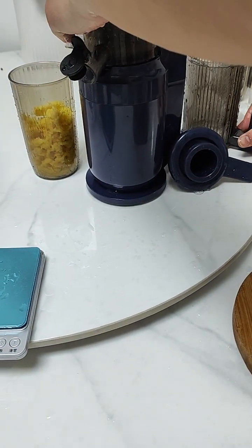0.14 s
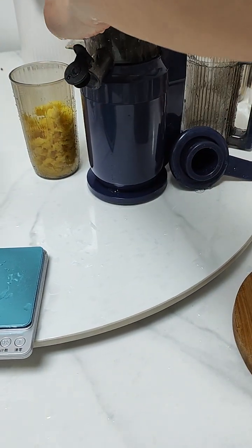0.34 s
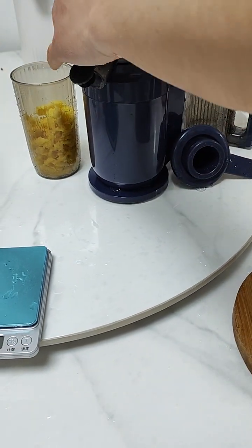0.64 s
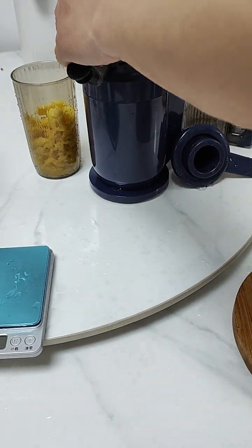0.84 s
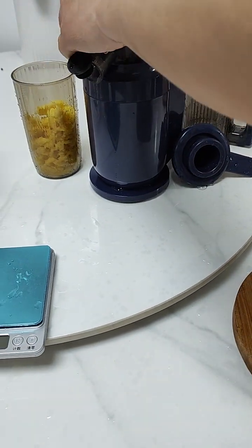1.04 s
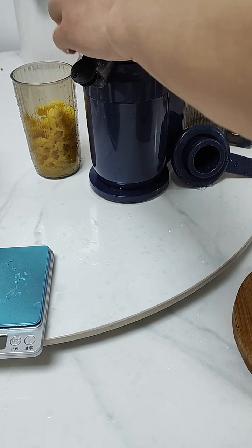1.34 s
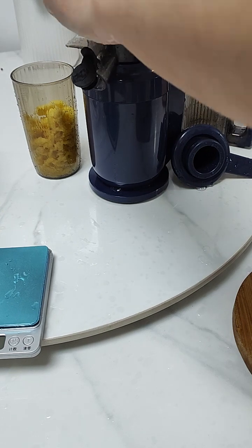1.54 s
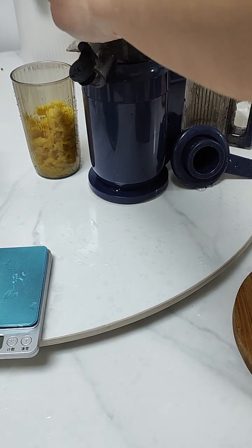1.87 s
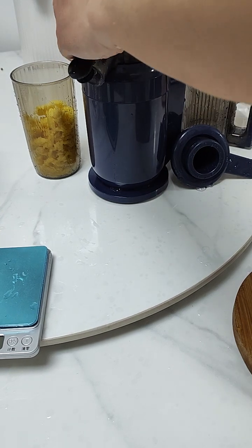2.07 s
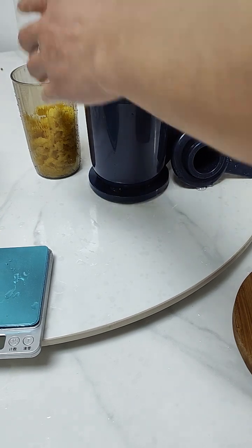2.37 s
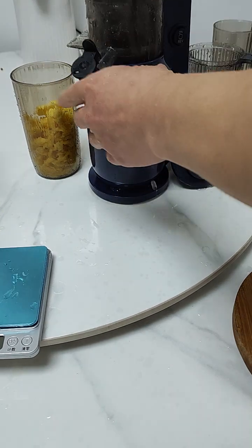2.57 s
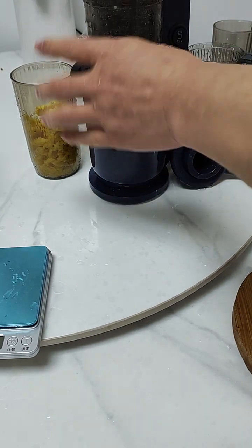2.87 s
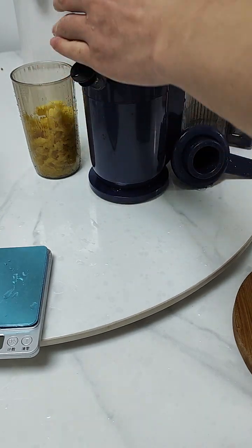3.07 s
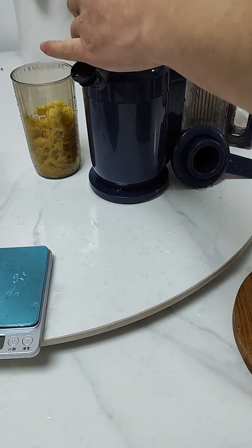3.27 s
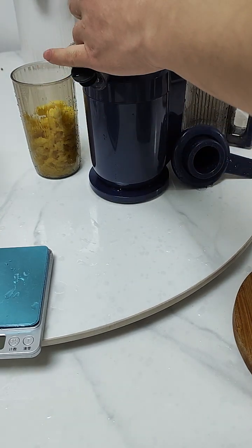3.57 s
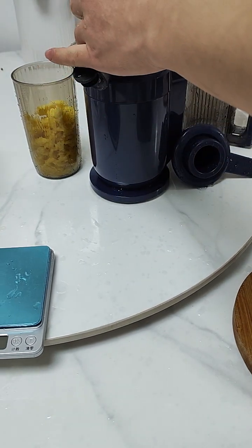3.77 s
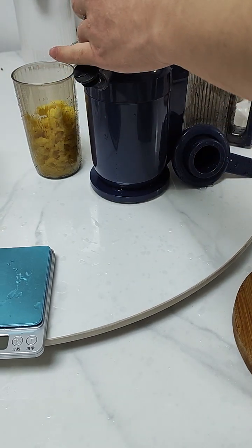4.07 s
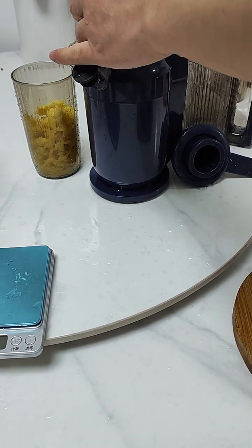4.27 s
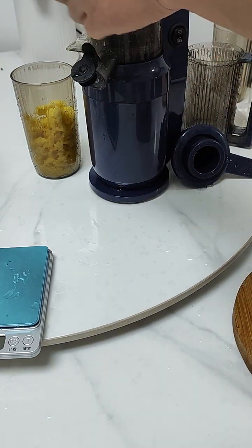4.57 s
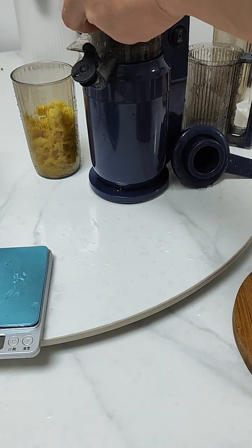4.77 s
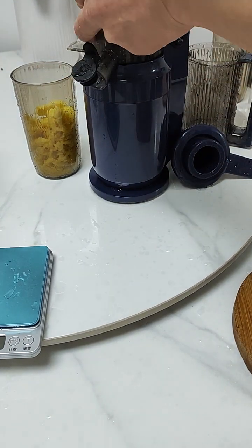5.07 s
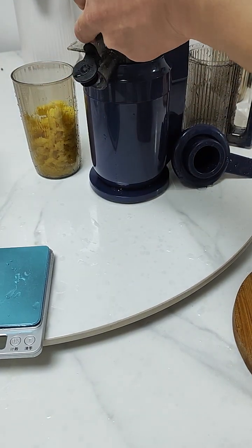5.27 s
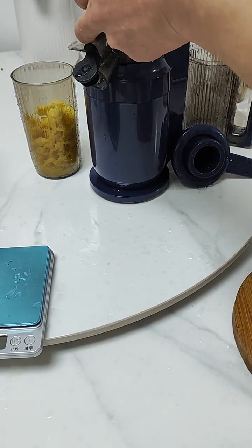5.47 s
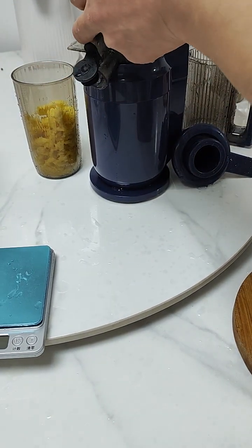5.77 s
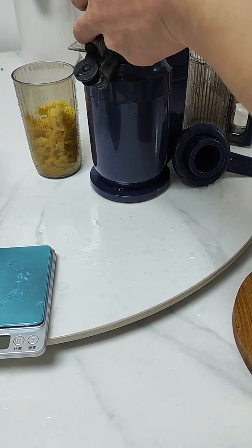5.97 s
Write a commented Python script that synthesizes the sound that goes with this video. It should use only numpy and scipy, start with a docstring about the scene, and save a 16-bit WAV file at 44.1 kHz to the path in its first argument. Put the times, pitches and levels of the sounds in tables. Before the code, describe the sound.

Close to a stone table in a bare, reverberant kitchen, a jug lands with hollow knocks at the very start. After a gap, hands fit a hard plastic bowl onto a base: light ticks, then sharp clacks in tight bursts, another rattle, and finally sparse, faint taps with barely audible rubbing. A low, quiet room tone continues throughout, picked up by a close stereo phone microphone.

```python
"""In a bare, echoing kitchen, hands fit a hard plastic juicer bowl onto its base on a stone table.
A jug is set down first; then the parts knock, tick and rub, over a quiet room tone.
Blows are sums of damped modes with short clicks; rubbing and room tone are coloured noise.
The room answers with sparse decaying taps; two unlike phone microphone ports listen from close by."""
import sys
import numpy as np
from scipy import signal
from scipy.io import wavfile
from scipy.ndimage import uniform_filter1d

SR = 44100
rng = np.random.default_rng(int(sys.argv[2]) if len(sys.argv) > 2 else 0)


def generate_wav(sig):
    """Save sig (samples, or channels by samples) to the path in sys.argv[1] as 16-bit PCM at SR."""
    pcm = np.round(np.clip(np.atleast_2d(sig).T, -1, 1) * 32767).astype(np.int16)
    wavfile.write(sys.argv[1], SR, pcm)


N = 270326  # samples

# Blows of the jug on the table, then of the bowl on its base. Each row: start [s],
# low ring pitch [Hz], low ring level [dB], treble ring pitch [Hz], treble ring level [dB],
# crack level [dB], tick level [dB], table thud level [dB], left over right level [dB].
JUG_KNOCKS = [(0.005, 734, -10, 1720, -30.5, -42, -39.5, -51, 5.5),
              (0.051, 720, -15, 1680, -43, -47, -55, -43.5, 1),
              (0.206, 816, -12, 1880, -29, -39.5, -23.5, -29, 0)]
BOWL_KNOCKS = [(0.967, 869, -125, 2160, -61, -54, -63, -56, 4),
               (1.017, 1200, -26.5, 1740, -37, -33, -46.5, -53, 0.5),
               (1.267, 890, -39, 2400, -43, -32, -30.5, -59.5, -4),
               (1.49, 1170, -48.5, 3010, -57, -50.5, -55, -55, 2),
               (1.514, 1060, -26, 1650, -42, -44, -39.5, -45, -2.5),
               (1.633, 1130, -41, 4000, -42, -45, -32, -52, 1),
               (1.654, 1096, -17, 2550, -24, -20, -51, -54, -6),
               (1.657, 1070, -8, 2690, -27, -25.5, -11.5, -66, 6),
               (1.667, 1080, -18.5, 2130, -47, -15.5, -24, -33, -10.5),
               (1.924, 1165, -22, 3110, -28.5, -26.5, -25, -66, -5),
               (1.935, 1200, -19, 3100, -39, -17.5, -14, -39, 1.5),
               (1.956, 1290, -13.5, 2560, -49, -14, -27, -71, 11),
               (1.962, 1150, -33, 3100, -49, -21.5, -19, -46, 17.5),
               (2.288, 730, -30, 3130, -56, -38.5, -35, -43, -4),
               (2.291, 1240, -52, 2170, -48.5, -31.5, -55, -52, 2),
               (2.3, 1120, -31, 1680, -42.5, -39, -45, -56, 8),
               (2.381, 824, -33, 3200, -50, -44.5, -44, -55, -3),
               (2.395, 1140, -33, 2080, -57, -47, -58, -45.5, 11),
               (2.535, 746, -52, 1750, -73, -67.5, -81, -67.5, -6),
               (2.661, 738, -52, 2500, -57, -58, -61, -45.5, 8),
               (2.686, 1180, -36.5, 1950, -58, -36.5, -36.5, -59, 1),
               (2.693, 1120, -32, 2740, -38, -39, -54, -39.5, 2),
               (2.703, 544, -19, 2680, -28, -23, -23, -38.5, 3.5),
               (2.707, 740, -25, 1880, -27, -31, -55, -34.5, -8),
               (2.715, 1000, -16.5, 2400, -31, -32, -28.5, -40.5, 11.5),
               (2.723, 500, -29.5, 1940, -53, -35, -26.5, -74, -0.5),
               (3.124, 620, -38.5, 2800, -56.5, -50.5, -49, -65, 0),
               (3.184, 630, -61.5, 2194, -69, -62, -59, -54.5, -2.5),
               (3.347, 544, -72, 3730, -64.5, -64.5, -76.5, -63.5, 1),
               (3.74, 581, -54.5, 1920, -73, -81, -86.5, -65.5, -13.5),
               (4.206, 890, -44.5, 2650, -46.5, -45, -40, -54.5, -3),
               (4.324, 600, -47.5, 2970, -60, -61, -68, -65.5, -1),
               (4.455, 770, -44.5, 2810, -50, -53.5, -71, -54, -4),
               (4.464, 647, -38.5, 2740, -42, -40.5, -70, -62, 4.5),
               (4.665, 1240, -62, 2580, -61.5, -50.5, -65.5, -54, 2),
               (4.672, 602, -38.5, 2860, -61, -66, -72, -68, -10),
               (4.775, 744, -35, 2840, -47, -44.5, -59, -51, 0.5),
               (4.796, 578, -41.5, 2965, -62, -48, -45, -64, -2),
               (5.437, 818, -66, 1940, -64, -68.5, -56, -58, 6),
               (5.463, 730, -50, 2850, -61.5, -62, -60, -75, 2),
               (5.678, 530, -48, 3580, -70.5, -69, -69.5, -43, 0),
               (5.69, 660, -44, 2580, -60.5, -47, -61, -56, 8),
               (5.712, 583, -48, 3090, -71, -53.5, -67, -52, -2),
               (5.739, 532, -61, 2290, -68, -50, -64, -69, -1)]
# Modes of the struck bodies. Each row: frequency [Hz], bandwidth [Hz], relative level [dB].
JUG_MODES = [(345, 30, -9), (454, 4.6, -17), (490, 17, 0.5), (580, 22, -3.5), (736.5, 19, -7),
             (781, 26, 5.5), (1023, 59, 8.5), (1345, 24, 3), (1502, 90, 5), (1776, 23, -11.5),
             (2080, 33, -21), (2370, 69, -16), (3300, 79, -14), (3480, 140, -17), (5060, 310, 8),
             (5500, 550, 10.5), (6650, 510, 23)]
BOWL_MODES = [(459, 28, -8), (585, 73, -11), (736, 38, -14.5), (772.6, 66, -29), (990, 45, -39.5),
              (1102, 120, 10), (1228, 280, 14), (1350, 51, -9.5), (1720, 27, -0.5), (1880, 160, 13.5),
              (2700, 77, -5.5), (3020, 230, -6.5), (3520, 170, -2), (4530, 60, 1), (5420, 330, -8),
              (6250, 100, -8)]
TABLE_MODES = [(122, 12, -10), (194.6, 9.6, -1.7), (252, 28, 3), (343, 36, -2.5)]
# The dense upper modes of the plastic blur into two short clicks.
# Each row: frequency [Hz], relative level [dB].
CRACK = [(400, -47.5), (1300, 3.5), (2000, 7.5), (3500, -1.5), (5000, -5.5), (16000, -37)]
TICK = [(1500, -39.5), (3500, -12.5), (5000, 4), (9000, -0.5), (16000, -5)]
# Constants of every blow of a part. In order: straight path strength [factor],
# spread of the low ring [octaves], spread of the treble ring [octaves], level sent to the room [dB].
JUG_BLOW = (0.2, 0.49, 0.85, 0.31)
BOWL_BLOW = (0.3, 0.29, 0.4, -1.3)
# Strokes of skin sliding on plastic.
# Each row: time [s], level of the dull share [dB], bright share relative to the dull [dB].
RUBBING = [
    [(0.5, -76, -5), (1.0, -76, -2.5), (1.9, -77, -7.5), (2.7, -84.5, -7), (2.95, -84, -7.5)],
    [(2.95, -105.5, -14), (3.068, -77, 3), (3.35, -86, 0)],
    [(4.95, -92, -5), (5.09, -83.5, -2), (5.53, -76.5, -4.5), (5.644, -74, -8), (5.888, -78.5, -7.5),
     (6.13, -80.5, -5)],
]
# Spectra of the two shares of rubbing. Each row: frequency [Hz], relative level [dB].
DULL_RUB = [(200, -32), (600, -2), (2000, 2.5), (5000, -5), (8000, -8), (9000, -38)]
BRIGHT_RUB = [(7000, -34), (9000, -0.5), (16000, -7)]
# Likeness of the two channels of each share. Each row: frequency [Hz], correlation [-1 to 1].
DULL_SAME = [(100, 0.32), (16000, 0.079)]
BRIGHT_SAME = [(100, 0.3), (16000, 0.1)]
# Spectra of the room tone and the electronic hiss. Each row: frequency [Hz], relative level [dB].
TONE = [(12, -51.5), (20, -5.5), (119, -11), (150, -9), (183, 1.5), (254, -7), (288, -7), (502, -20),
        (541, -10), (696, -17), (789, -18), (895, -17.5), (1240, -21), (1370, -24.5), (8200, -50.5),
        (10700, -80.5), (18000, -120)]
HISS = [(4820, -32.5), (8200, -78.5), (8790, -8), (9540, -17), (10600, -15), (15100, -4.5), (16000, -27)]
# Likeness of the channels of room tone and of hiss. Each row: frequency [Hz], correlation [-1 to 1].
TONE_SAME = [(60, 0.98), (130, -0.03), (290, 0.95), (640, 0.25), (1410, -0.064), (3100, -0.068),
             (6820, -0.48), (15000, -0.04)]
HISS_SAME = [(100, 0), (16000, 0)]
# Reverberation by band.
# Each row: frequency [Hz], time to fall by 60 dB [s], relative starting strength [dB].
KITCHEN = [(101, 0.45, 6), (210, 0.3, -6), (386, 0.47, 0.5), (740, 0.44, -5), (1090, 0.41, -3),
           (1810, 0.45, 1), (4800, 0.54, -2.26), (8140, 0.44, 2), (11300, 0.39, -4.5), (16000, 1, -13.5)]
# Responses of the microphone ports. Each row: frequency [Hz], gain [dB].
LEFT_PORT = [(100, -2.5), (5000, 8.5), (7000, 9), (8000, 5.5), (10000, 7), (12500, 3.5), (16000, -2.5)]
RIGHT_PORT = [(100, -3.5), (5200, 9.5), (6300, 14.5), (7100, 21), (7600, 9), (8200, -19.5), (12000, 3.5),
              (16000, -20)]

TONE_DB, HISS_DB = -61, -79  # rms, the tone before the ports and the hiss after them
LEFT_LEADS = 13  # samples by which direct knocks reach the left port sooner
EDGE_HZ = 16000  # upper band limit
TREBLE_HZ = 1500  # modes above this belong to the treble ring
SMALL_HZ, BASS_HZ = 220.6, 102.0  # high-pass corners: for the plastic parts, for all blows
JUG_SCATTER_S, BOWL_SCATTER_S = 0.008, 0.0036  # decay constants of the scattered glints


def gain_of(db):
    """Level to amplitude: 20 dB is a factor of ten."""
    return 10 ** (np.asarray(db) / 20)


def evened(x):
    """Power normalisation: scales to rms 1."""
    return x / np.sqrt(np.mean(x ** 2) + 1e-20)


def peaked(x):
    """Amplitude normalisation: scales to peak 1."""
    return x / abs(x).max()


def read(points, hz):
    """Linear interpolation of a table on a logarithmic frequency axis."""
    f, value = np.transpose(points)
    return np.interp(np.log(hz + 1), np.log(f + 1), value)


def add(mix, s, sound):
    """Superposition: adds a sound to the mix from a given time in seconds."""
    part = mix[..., round(s * SR):][..., :sound.shape[-1]]
    part += sound[..., :part.shape[-1]]


def causal(points, size=1024):
    """Minimum phase: the phase follows from the log gain by the Hilbert transform."""
    hz = abs(np.fft.fftfreq(4 * size, 1 / SR))
    log_gain = np.log(gain_of(read(points, hz)))
    phase = -signal.hilbert(log_gain).imag
    return np.fft.ifft(np.exp(log_gain + 1j * phase)).real[:size]


def noise(points, same, patchy_db):
    """Partial coherence: two channels of coloured noise share a part set by their likeness."""
    frames, hz = N // 256 + 5, np.fft.rfftfreq(1024, 1 / SR)
    a, b, c, d, patches = rng.standard_normal((frames, 513, 5)).T
    # drifting patches of level, smooth in frequency and in time
    patches = uniform_filter1d(patches, size=10, axis=0)
    patches = evened(uniform_filter1d(patches, size=12, axis=1))
    likeness = np.clip(read(same, hz), -1, 1)[:, None]
    left, other = a + 1j * b, c + 1j * d
    right = likeness * left + np.sqrt(1 - likeness ** 2) * other
    spectra = np.array([left, right])
    spectra *= gain_of(read(points, hz)[:, None] + patchy_db * patches)
    return evened(signal.istft(spectra, nperseg=1024, noverlap=768)[1][:, :N])


def room_tone():
    """Diffuse background: broadband noise whose coherence between ports varies with frequency."""
    return gain_of(TONE_DB) * noise(TONE, TONE_SAME, patchy_db=2.5)


def modes_of(body, size=8192):
    """Modal decay: each mode is a sine dying at a rate of pi times its bandwidth; one a row."""
    t = np.arange(size) / SR
    hz, width, db = np.transpose(body)[:, :, None]
    return gain_of(db) * np.exp(-np.pi * abs(width) * t) * np.sin(2 * np.pi * hz * t)


def table_thud():
    """Inertia of a heavy slab: its modes take time to swing up before they die."""
    modes = modes_of(TABLE_MODES).sum(0)
    t = np.arange(len(modes)) / SR
    return peaked(modes * (1 - np.exp(-t / 0.014)))


def favoured(hz, modes, centre_hz, spread):
    """Modal excitation: the place of the blow favours modes near one pitch."""
    octaves_off = np.log2(hz / centre_hz)
    return gain_of(-6 * (octaves_off / spread) ** 2) @ modes


def scattered(plastic, straight, scatter_s, size):
    """Multipath scattering: neighbouring parts and the hands glint differently toward each port."""
    draw, t = rng.random((2, 2, 1024)), np.arange(1024) / SR
    envelope = (1 - np.exp(-t / 0.00093)) * np.exp(-t / scatter_s)
    chosen = draw[0] < 2500. / SR  # on average 2500 glints a second
    glints = envelope * chosen * (2 * draw[1] - 1)
    glints[:, 60] = straight
    smooth = uniform_filter1d(uniform_filter1d(glints, size=50, axis=1), size=50, axis=1)
    glints[1] += smooth[0] - smooth[1]  # long waves bend round the obstacles
    near = signal.oaconvolve(plastic[None], glints, axes=1)[:, :size]
    # scattering keeps the energy
    return near * np.linalg.norm(plastic) / np.linalg.norm(near, axis=1, keepdims=True)


def knock(row, blow, scatter_s, hz, modes, thud, crack, tick):
    """Impact excitation: a blow shakes the table, rings the part and clicks.

    Output rows: left port, right port, sound sent to the room.
    """
    ring_hz, ring_db, treble_hz, treble_db, crack_db, tick_db, thud_db, pan_db = row[1:]
    straight, spread, treble_spread, room_db = blow
    ring = peaked(favoured(hz, modes, ring_hz, spread))
    is_treble = (hz > TREBLE_HZ)[:, None]
    treble = peaked(favoured(hz, is_treble * modes, treble_hz, treble_spread))
    plastic = gain_of(ring_db) * ring + gain_of(treble_db) * treble
    plastic += gain_of(crack_db) * crack + gain_of(tick_db) * tick
    plastic = signal.sosfilt(signal.butter(2, SMALL_HZ, "high", fs=SR, output="sos"), plastic)
    near = scattered(plastic, straight, scatter_s, len(thud))
    near *= gain_of(np.array([[pan_db], [-pan_db]]) / 2)
    sent = plastic + 0.54 * near[0]  # the room also hears the scattered sound, with its uneven colour
    return np.vstack([near, gain_of(room_db) * sent]) + gain_of(thud_db) * thud


def knocks_of(rows, blow, scatter_s, body):
    """Superposition of blows on one body; the deep bass of every blow, thud included, is cut."""
    mix, thud = np.zeros((3, N)), table_thud()
    crack, tick = (peaked(np.pad(causal(c), (0, len(thud) - 1024))) for c in (CRACK, TICK))
    hz, modes = np.transpose(body)[0], modes_of(body)
    for row in rows:
        add(mix, row[0], knock(row, blow, scatter_s, hz, modes, thud, crack, tick))
    return signal.sosfilt(signal.butter(3, BASS_HZ, "high", fs=SR, output="sos"), mix)


def jug_knocks():
    """Impact of the jug on the slab: both bodies ring in their own modes."""
    return knocks_of(JUG_KNOCKS, JUG_BLOW, JUG_SCATTER_S, JUG_MODES)


def bowl_knocks():
    """Impact of the bowl on its base: hard plastic modes ring while the table answers."""
    return knocks_of(BOWL_KNOCKS, BOWL_BLOW, BOWL_SCATTER_S, BOWL_MODES)


def room_tail(early_db, late_db):
    """Reverberant decay: early echoes off table and walls, then sparse taps dying band by band."""
    taps = np.zeros((2, SR // 2))
    jitter = rng.integers(0, 20, (2, (SR // 2 - 201) // 20))
    late_at = np.arange(200, SR // 2 - 20, 20) + jitter
    np.put_along_axis(taps, late_at, rng.choice([-1., 1.], late_at.shape), 1)
    early_at = rng.integers(130, 900, (2, 7))
    np.put_along_axis(taps, early_at, gain_of(early_db) * rng.choice([-1., 1.], (2, 7)), 1)
    hz, s, z = signal.stft(taps, SR, nperseg=256)
    z[1, hz < 400] = z[0, hz < 400]  # long waves reach both ports alike
    bands_hz, t60, strength_db = np.transpose(KITCHEN)
    decay_db = -60 * s / read(np.c_[bands_hz, t60], hz)[:, None]
    start_db = read(np.c_[bands_hz, strength_db], hz)[:, None]
    tail = signal.istft(z * gain_of(decay_db + start_db), SR, nperseg=256)[1]
    return tail * gain_of(late_db) / np.linalg.norm(tail[0])


def kitchen(sent, early_db=5.5, late_db=-1.0):
    """Room response by convolution: three decaying tails take turns."""
    out, t = np.zeros((2, N)), np.arange(N) / SR
    for k in range(3):
        tail = room_tail(early_db, late_db)
        turn = np.cos(np.pi * (1.731 * t + k / 3)) * np.sqrt(2 / 3)  # squares sum to 1
        out += signal.fftconvolve((sent * turn)[None], tail, axes=1)[:, :N]
    return out


def rubbing():
    """Sliding friction: skin sticks and slips on the parts, a soft, gritty hiss, dull and bright."""
    dull = noise(DULL_RUB, DULL_SAME, patchy_db=3.5)
    bright = noise(BRIGHT_RUB, BRIGHT_SAME, patchy_db=-5.5)
    grit_db = 0.89 * evened(uniform_filter1d(rng.standard_normal(N), size=150))
    t, mix = np.arange(N) / SR, np.zeros((2, N))
    for stroke in RUBBING:
        s, level_db, brightness_db = np.transpose(stroke)
        fade = np.clip(np.minimum(t - s[0], s[-1] + 0.05 - t) / 0.08, 0, 1)
        hiss = dull + gain_of(np.interp(t, s, brightness_db)) * bright
        mix += fade * gain_of(np.interp(t, s, level_db)) * hiss
    return mix * evened(gain_of(grit_db))


def scene():
    """Superposition of direct sound, a little sooner on the left, the room's answer and its tone."""
    tone = room_tone()
    left, right, sent = jug_knocks() + bowl_knocks()
    direct = np.array([left, np.r_[np.zeros(LEFT_LEADS), right][:N]])
    return tone + direct + kitchen(sent) + rubbing()


def record(dry):
    """Linear filtering: each port colours the sound; electronics hiss; a low-pass limits the band."""
    ports = np.array([causal(LEFT_PORT), causal(RIGHT_PORT)])
    heard = signal.oaconvolve(dry, ports, axes=1)[:, :N]
    heard += gain_of(HISS_DB) * noise(HISS, HISS_SAME, patchy_db=2.5)
    band_limit = signal.firwin(511, EDGE_HZ, window=("kaiser", 9), fs=SR)
    return signal.oaconvolve(heard, band_limit[None], "same")


dry = scene()
out = record(dry)
generate_wav(out)
```